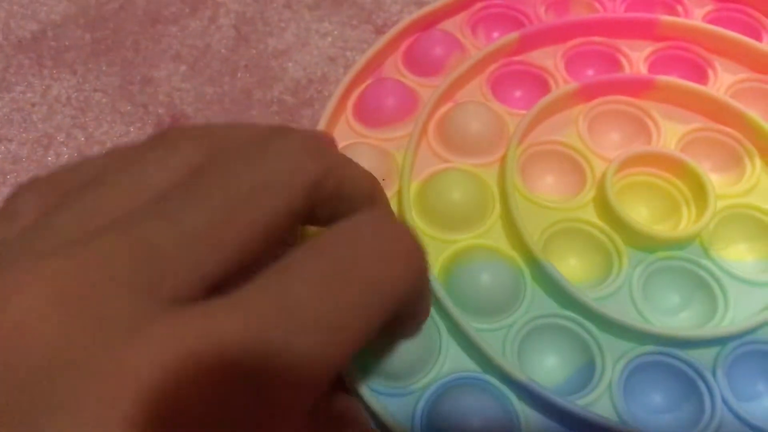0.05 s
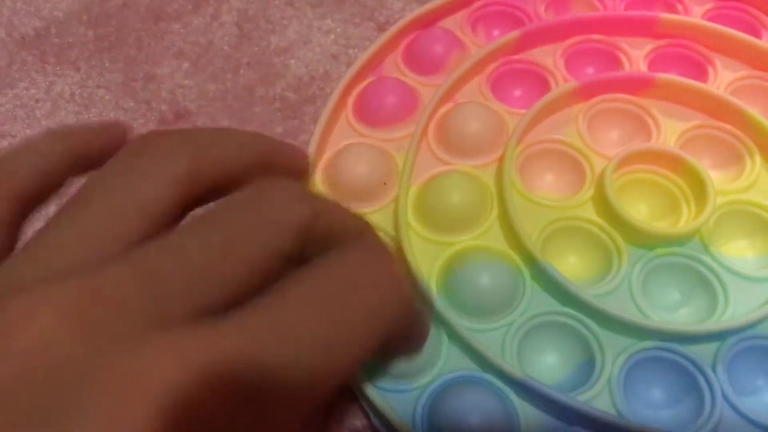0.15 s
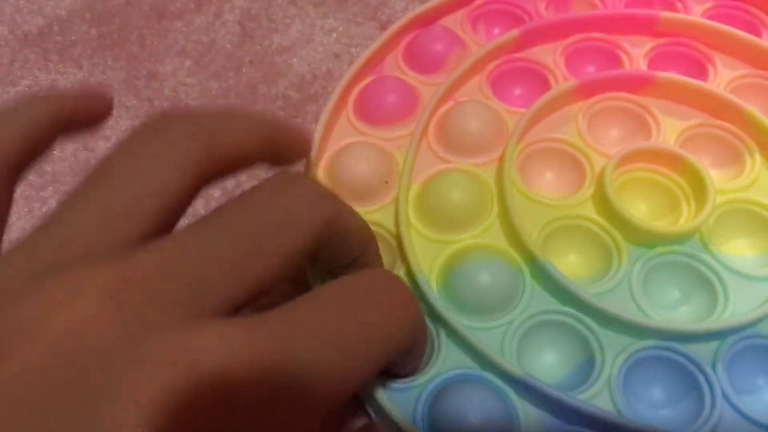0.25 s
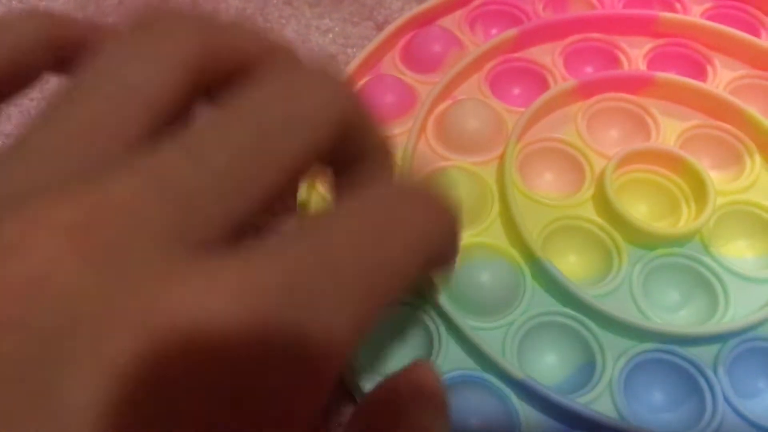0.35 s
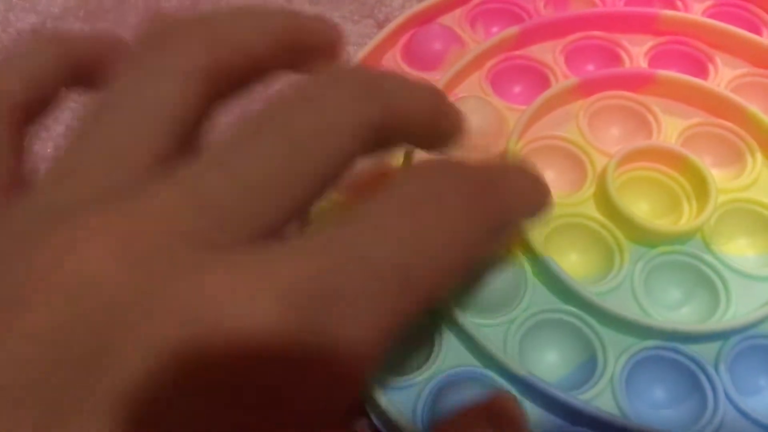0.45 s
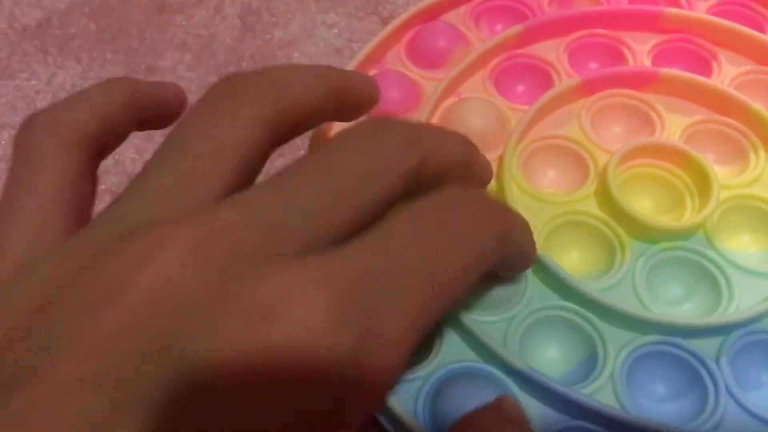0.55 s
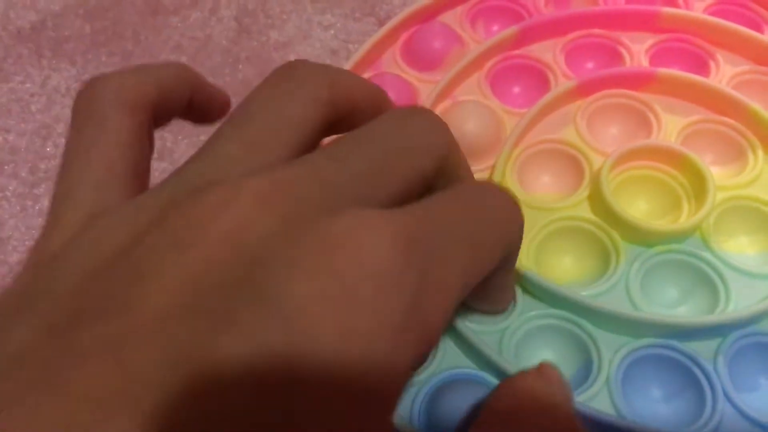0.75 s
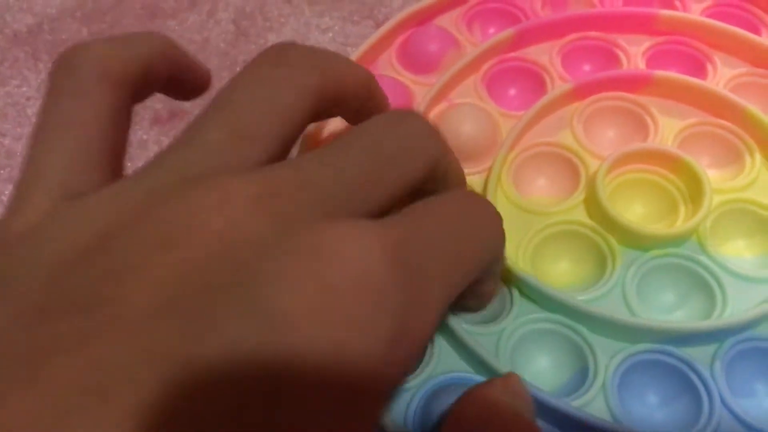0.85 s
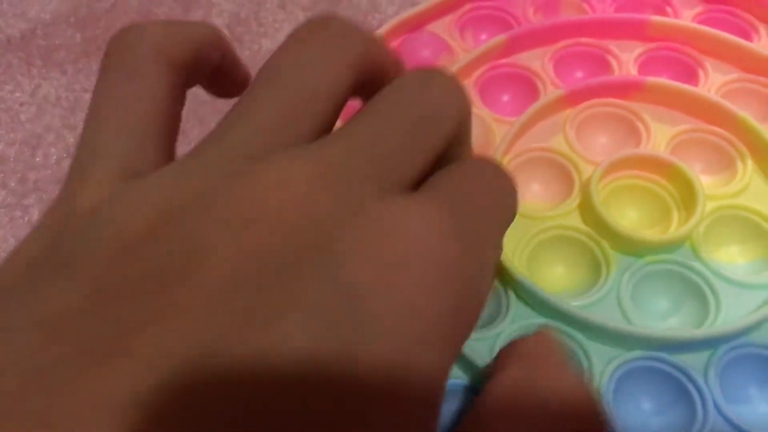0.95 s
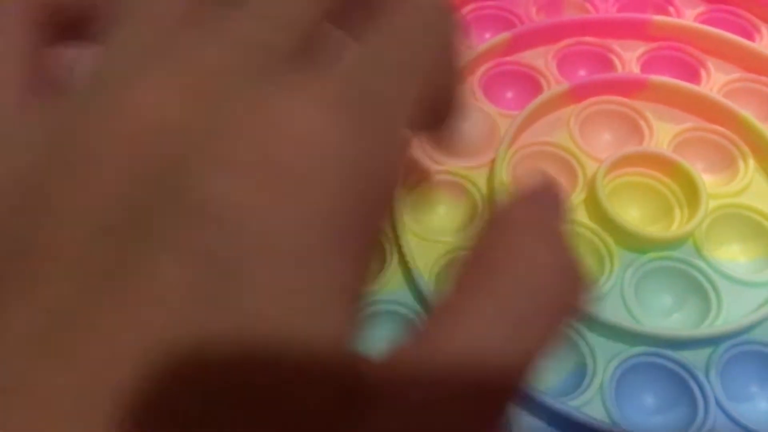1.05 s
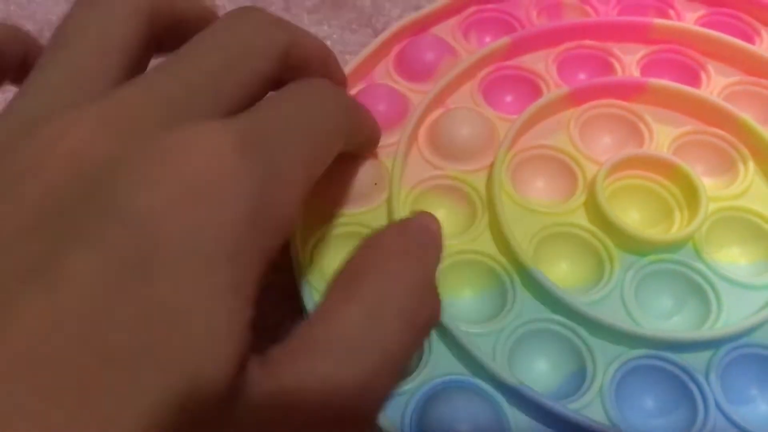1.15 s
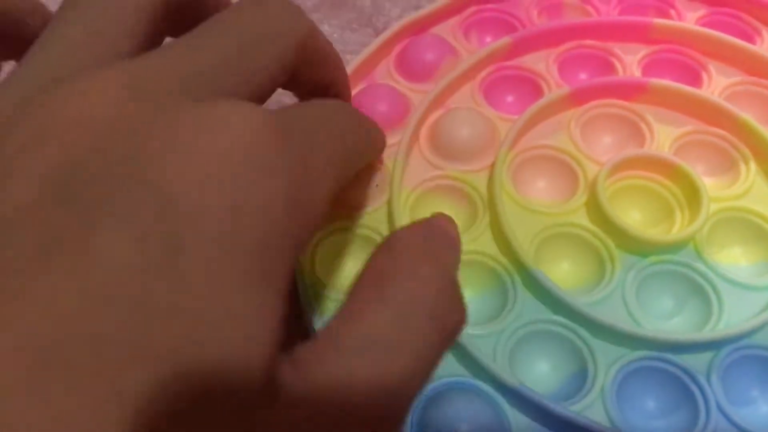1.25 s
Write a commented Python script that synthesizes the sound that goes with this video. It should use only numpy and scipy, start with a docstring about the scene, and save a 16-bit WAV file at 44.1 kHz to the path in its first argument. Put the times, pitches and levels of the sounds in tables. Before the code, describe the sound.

A silicone pop toy gives three short, sharp pops under fingers in a quiet room.

```python
"""Silicone pop toy.

Fingers press three bubbles, close to the microphone in a small, quiet room. Each dome slips
under the fingertip with a tiny hiss, snaps through, rings for a few milliseconds and rebounds.
Between the pops the fingers bump the soft sheet; near walls answer, over a low room rumble."""
import sys
import numpy as np
from scipy import signal
from scipy.fft import rfft, irfft, next_fast_len
from scipy.io import wavfile

SR = 44100
rng = np.random.default_rng(int(sys.argv[2]) if len(sys.argv) > 2 else 0)


def store_pcm(level_fs):
    """Save levels as 16-bit WAV."""
    pcm = np.round(np.clip(level_fs, -1, 1) * 32767).astype(np.int16)
    wavfile.write(sys.argv[1], SR, np.atleast_2d(pcm).T)


N = 57330
TIME_S = np.arange(N) / SR


def amp(db):
    """Gain of a level in dB."""
    return 10 ** (np.asarray(db) / 20)


def along(points, hz):
    """Interpolate (frequency [Hz], value) points on a log axis."""
    point_hz, values = np.transpose(points)
    return np.interp(np.log(hz + 1), np.log(point_hz + 1), values)


def filtered(x, response):
    """Apply a frequency response, given as a function of Hz."""
    size = next_fast_len(N + SR // 2)
    return irfft(rfft(x, size) * response(np.fft.rfftfreq(size, 1 / SR)), size)[:N]


def noise(colour):
    """Coloured noise of rms 1."""
    x = filtered(rng.standard_normal(N), lambda hz: amp(along(colour, hz)))
    return x / np.std(x)


def pulse(peak_s, rise_ms, fall_ms):
    """Envelope with exponential rise and fall, peak 1."""
    ms = (TIME_S - peak_s) * 1000
    return np.exp(-np.abs(ms) / np.where(ms < 0, rise_ms, fall_ms))


def rubber_ring(start_s, modes, pitch_ratio=1):
    """Heavily damped rubber modes swell and die, neighbours in opposite polarity."""
    age_s = np.maximum(TIME_S - start_s, 0)
    out = np.zeros(N)
    for k, (hz, db, swell_ms) in enumerate(modes):
        swell = 1000 * age_s / swell_ms
        envelope = amp(db) * swell * np.exp(1 - swell)
        out += (-1) ** k * envelope * np.sin(2 * np.pi * hz * pitch_ratio * age_s)
    return out


# Room noise spectrum (frequency [Hz], relative density [dB])
RUMBLE_COLOUR = [(15, -54), (25, -21.5), (84, 3), (153, -4.5), (195, -2), (270, -6.5), (317, -8),
                 (531, -17), (659, -15.5), (962, -21), (1290, -19.5), (1840, -23), (3620, -26.5),
                 (7510, -31.5), (8590, -30), (14800, -36.5), (16000, -39)]


def room_rumble(rms_db=-62):
    """Steady low rumble with faint hiss."""
    return amp(rms_db) * noise(RUMBLE_COLOUR)


# Rubbing envelope (time [s], level [dB])
RUB_LEVELS = [(0, -71.5), (.2, -63), (.36, -62.5), (.5, -72), (.68, -72), (.88, -70), (1.052, -63.5),
              (1.2, -68), (1.3, -66)]
# Rubbing spectrum (frequency [Hz], relative density [dB])
RUB_COLOUR = [(40, -16), (95, 0), (220, 0), (380, -16), (700, -25.5), (2000, -31), (8000, -37.5)]


def hand_rub():
    """The moving hand rubs the toy: faint, low friction noise."""
    level_db = np.interp(TIME_S, *np.transpose(RUB_LEVELS))
    return amp(level_db) * noise(RUB_COLOUR)


# Sheet modes (frequency [Hz], relative level [dB], swell [ms])
SHEET_MODES = [(153, -3, 3.34), (290, -5.5, 0.91), (508, -11, 1.15), (1450, -24, .8)]
# Finger landings (time [s], gain [dB], pitch [ratio])
BUMPS = [(.2390, -41, 1.33), (0.5781, -41, 0.86), (0.613, -42.5, 1.04), (0.7343, -51.5, 1.48),
         (.993, -56, 1), (1.106, -61.5, 1.27)]


def finger_bumps():
    """Fingers land on the soft sheet with dull thuds."""
    return sum(amp(db) * rubber_ring(start_s, SHEET_MODES, ratio) for start_s, db, ratio in BUMPS)


# Skin slips on silicone (time [s], relative level [dB], rise [ms], fall [ms])
SLIPS = [(.2401, -47.5, .25, .75), (.2480, -41.5, .45, 1.2), (.2499, -40.5, .5, 1.3), (.7335, -65, .5, 1.0),
         (.7479, -62, .4, 1.0), (.7504, -43, .3, .8), (.9142, -55, .5, 1.2), (.9174, -50, .35, 1.1)]
# Slip spectrum (frequency [Hz], relative density [dB])
SLIP_COLOUR = [(300, -2.5), (2000, 1), (3600, -16.5), (6000, -6.5), (7400, -18), (8500, 0), (9600, -8.5),
               (11000, 3), (12800, -13.5), (14500, -1.5), (16000, -17)]


def fingertip_slips(gain_db=1.5):
    """Bright ticks of friction as a dome gives way under the fingertip."""
    envelope = sum(amp(db) * pulse(peak_s, rise_ms, fall_ms) for peak_s, db, rise_ms, fall_ms in SLIPS)
    return amp(gain_db) * envelope * noise(SLIP_COLOUR)


# Squeeze spectrum (frequency [Hz], relative density [dB])
SQUEEZE_COLOUR = [(30, -35), (100, -8), (420, 4), (750, -5), (1400, -2), (3500, -11), (10000, -26)]


def squeeze(snap_s, snap_peak, relative_db=-27):
    """Rubbing swells under the tightening press and fades after the snap."""
    press = pulse(snap_s, rise_ms=6.7, fall_ms=4.9)
    return amp(relative_db) * snap_peak * press * noise(SQUEEZE_COLOUR)


# Dome modes (frequency [Hz], relative level [dB], swell [ms])
FIRM_DOME = [(189, -26.5, 2.02), (382, -26, 1.5), (550.3, -31.5, 2.85), (1180, -30, 1.23),
             (1653, -37.5, 1.2), (2150, -44, 0.63), (3397, -33.5, 0.73), (4580, -40, 0.55),
             (6220, -39.5, 0.26)]
TIGHT_DOME = [(163, -37.5, 1.2), (289, -33.5, 1.58), (561, -45, 3.1), (768, -43.5, 5), (925, -38, 1.14),
              (1440, -31.5, 0.66), (1708, -39, 1.07), (2440, -39.5, 0.67), (3380, -46.5, 0.47)]
SLACK_DOME = [(173, -43.5, 4.8), (394, -38.5, 1.97), (591, -49.5, 3.8), (742, -53.5, 3.5), (1100, -46, 0.5),
              (1380, -47, 0.91), (1720, -74, 1.4), (3500, -58.5, 0.73)]
# Dome snaps (time [s], dome modes, gain [dB], send to rebound and room [dB])
POPS = [(0.2488, FIRM_DOME, -0.5, -1.5), (0.7506, TIGHT_DOME, -0.5, 0.5), (0.9144, SLACK_DOME, -1, -1)]


def dome_pops():
    """Each squeezed dome snaps through, rings, rebounds and excites the room."""
    out = np.zeros(N)
    for snap_s, modes, gain_db, send_db in POPS:
        snap = amp(gain_db) * rubber_ring(snap_s, modes)
        out += squeeze(snap_s, np.abs(snap).max()) + snap + amp(send_db) * rebound_and_room(snap)
    return out


# Dome rebound, then two echoes off walls (delay [s], relative level [dB])
EARLY_REPEATS = [(.0056, -17), (.0178, -12), (.0242, -22)]
# Tail decay (frequency [Hz], T60 [s])
TAIL_T60 = [(200, .2), (550, .2), (1400, .23), (3700, 0.22), (12000, .15)]
# Response of repeats and tail (frequency [Hz], gain [dB])
RETURN_COLOUR = [(80, -1), (200, -17), (380, -5), (520, -9.5), (750, -6), (1300, -2), (2200, -3),
                 (3500, -13.5), (6000, -8), (9000, -11), (16000, -16)]


def rebound_and_room(x, tail_db=-5, tail_delay_s=0.0029, tail_rise_s=0.0074):
    """A quick rebound of the dome, then two wall echoes and a short diffuse tail."""
    def repeat_response(hz):
        return sum(amp(db) * np.exp(-2j * np.pi * hz * delay_s) for delay_s, db in EARLY_REPEATS)

    band_hz, frame_s, spectra = signal.stft(rng.standard_normal(SR // 2), SR, nperseg=256)
    decay = amp(-60 * frame_s / along(TAIL_T60, band_hz)[:, None])
    tail = signal.istft(spectra * decay, SR)[1]
    age_s = np.maximum(np.arange(len(tail)) / SR - tail_delay_s, 0)
    tail *= 1 - np.exp(-age_s / tail_rise_s)
    diffuse = signal.fftconvolve(x, tail / np.linalg.norm(tail))[:N]
    returns = amp(tail_db) * diffuse + filtered(x, repeat_response)
    return filtered(returns, lambda hz: amp(along(RETURN_COLOUR, hz)))


def scene():
    """Pops, finger sounds and room at one microphone."""
    fingers = fingertip_slips() + finger_bumps()
    return (dome_pops() + fingers + rebound_and_room(fingers) + room_rumble() + hand_rub())[None]


LOW_CUT_HZ, BAND_LIMIT_HZ = 34, 16200


def record(dry):
    """The microphone sheds the deepest bass; nothing passes above the band limit."""
    low_cut = signal.butter(2, LOW_CUT_HZ, 'high', fs=SR, output='sos')
    thinned = signal.sosfilt(low_cut, dry[0])
    return filtered(thinned, lambda hz: hz < BAND_LIMIT_HZ)[None]


dry = scene()
out = record(dry)
store_pcm(out)
```